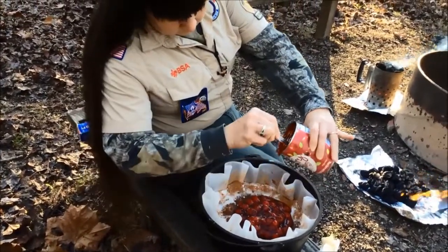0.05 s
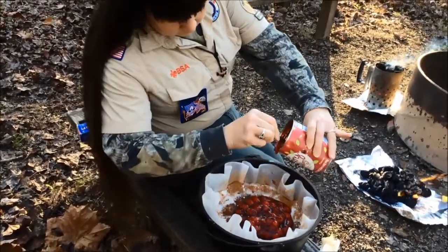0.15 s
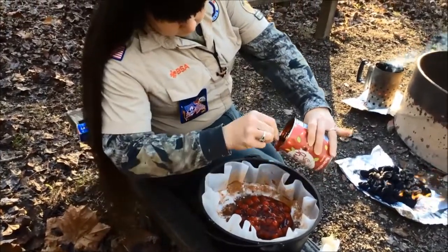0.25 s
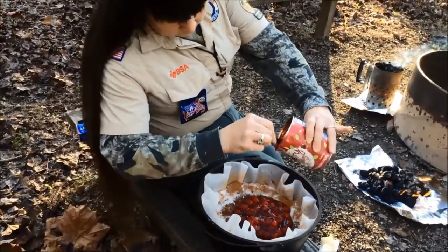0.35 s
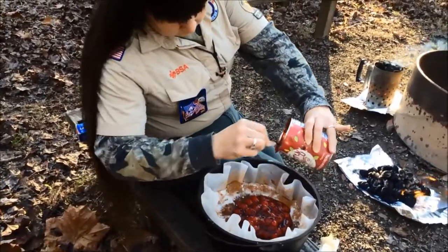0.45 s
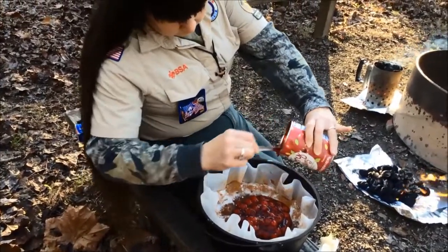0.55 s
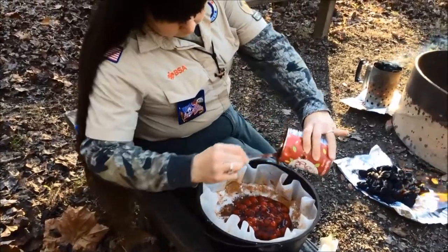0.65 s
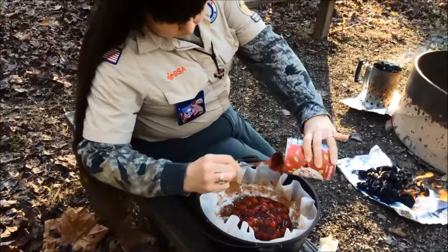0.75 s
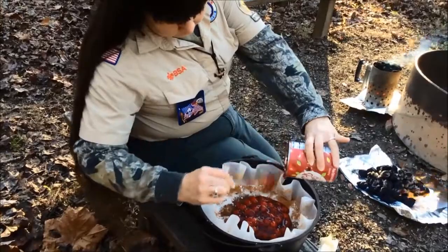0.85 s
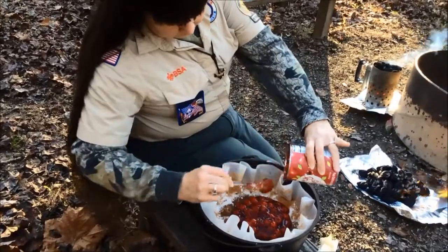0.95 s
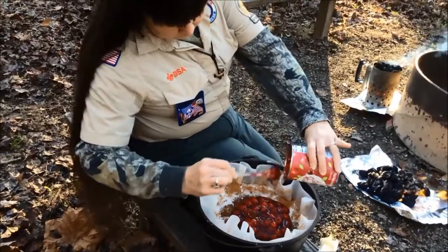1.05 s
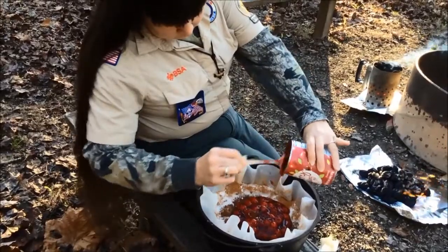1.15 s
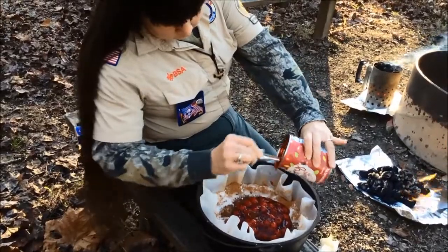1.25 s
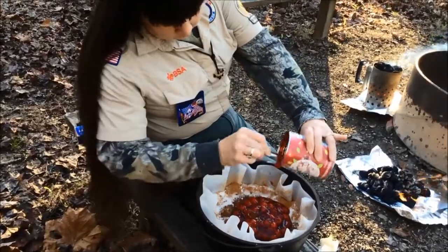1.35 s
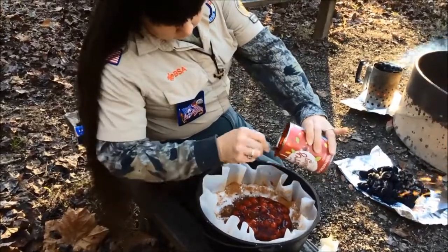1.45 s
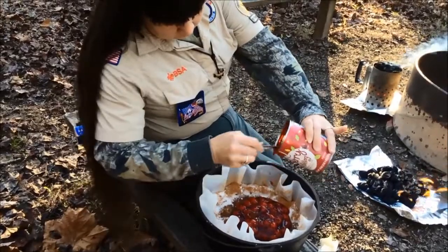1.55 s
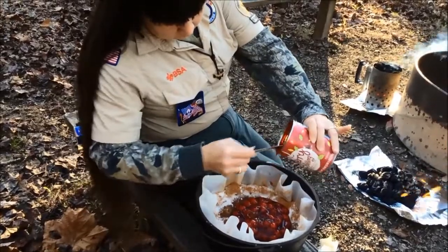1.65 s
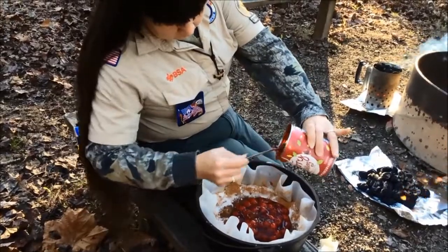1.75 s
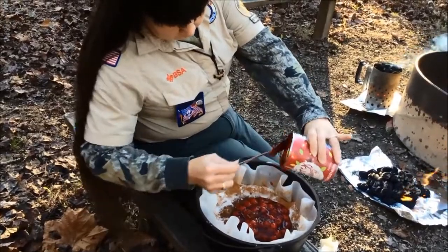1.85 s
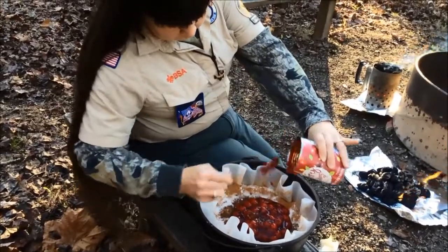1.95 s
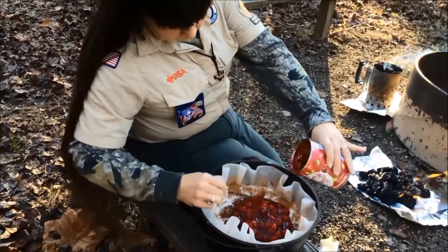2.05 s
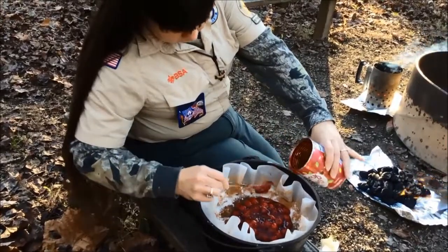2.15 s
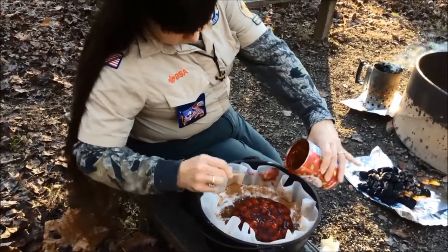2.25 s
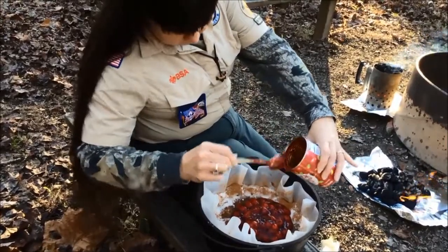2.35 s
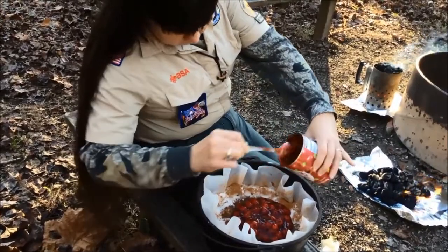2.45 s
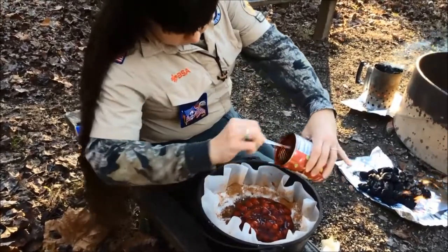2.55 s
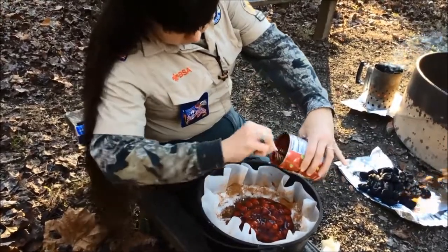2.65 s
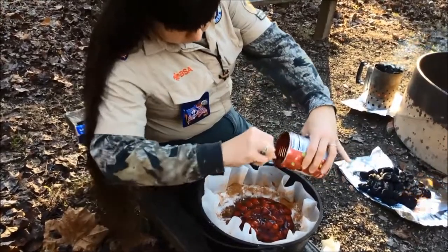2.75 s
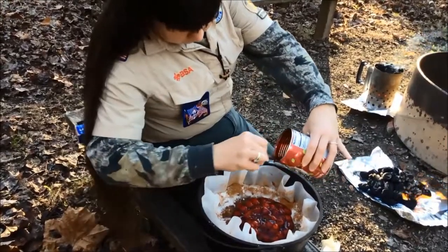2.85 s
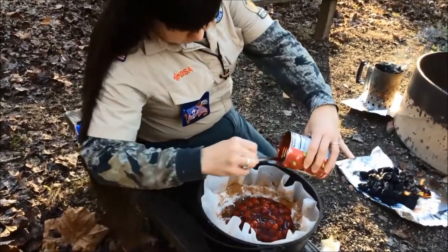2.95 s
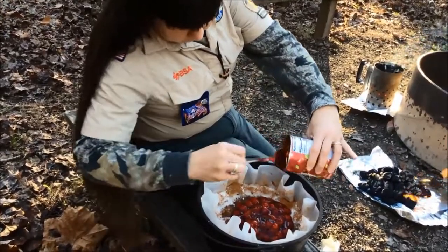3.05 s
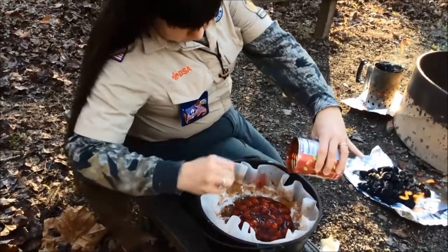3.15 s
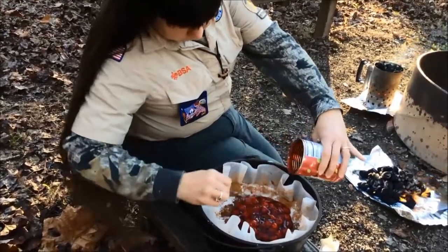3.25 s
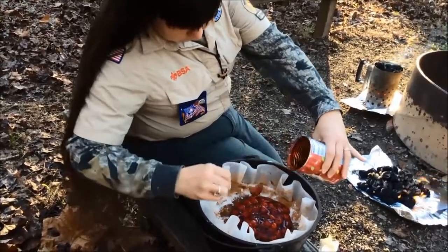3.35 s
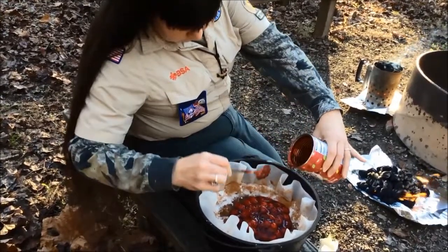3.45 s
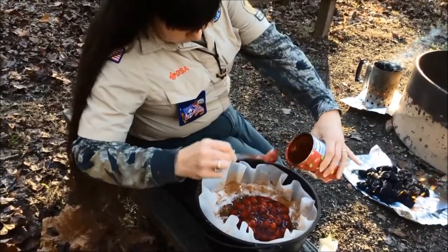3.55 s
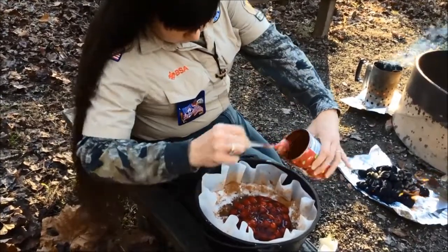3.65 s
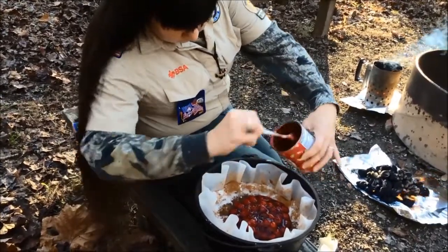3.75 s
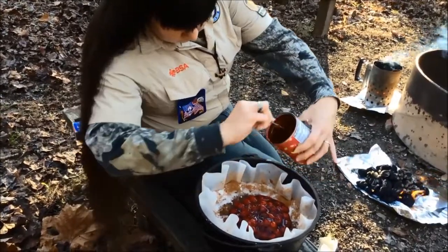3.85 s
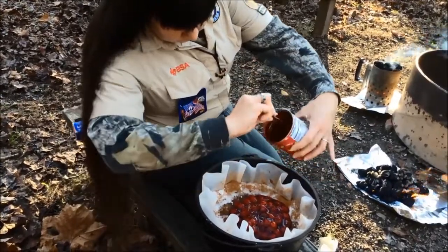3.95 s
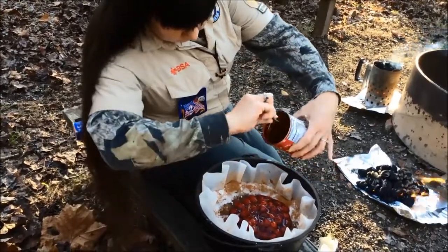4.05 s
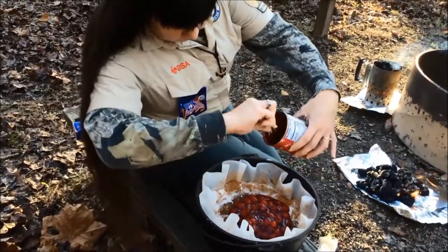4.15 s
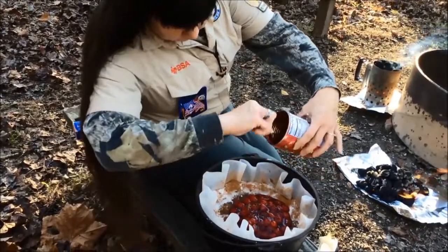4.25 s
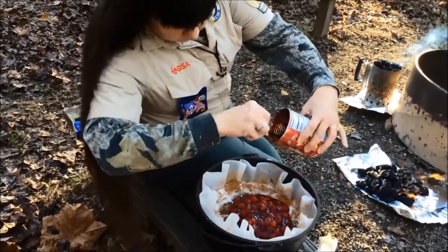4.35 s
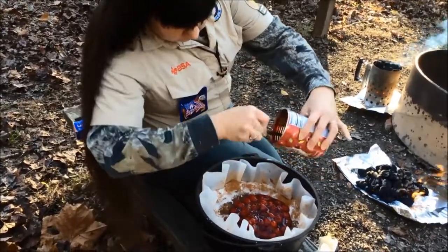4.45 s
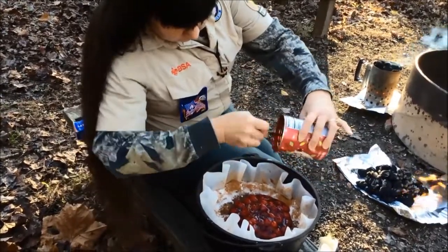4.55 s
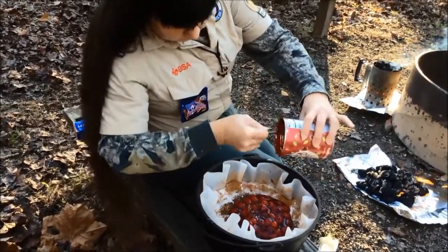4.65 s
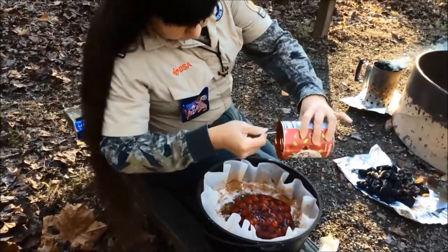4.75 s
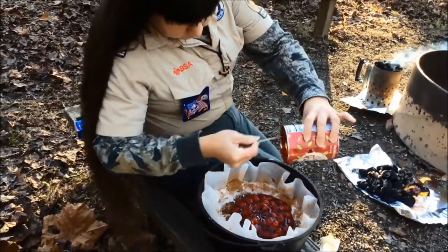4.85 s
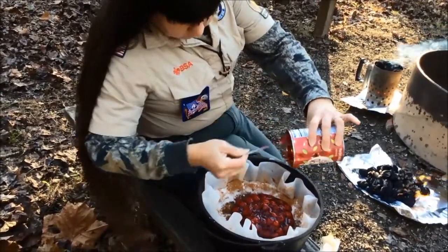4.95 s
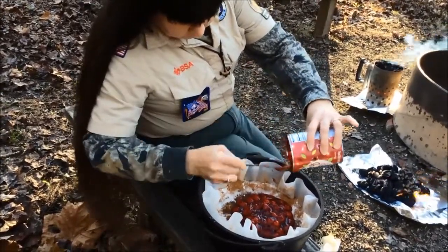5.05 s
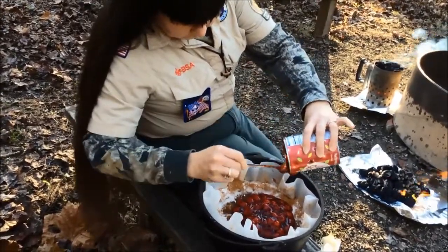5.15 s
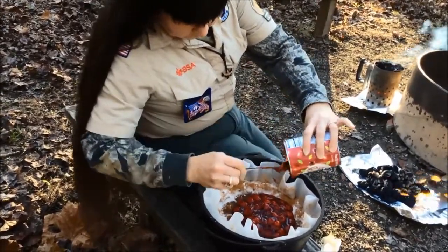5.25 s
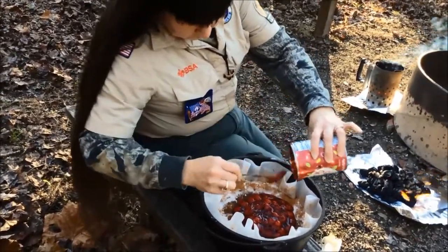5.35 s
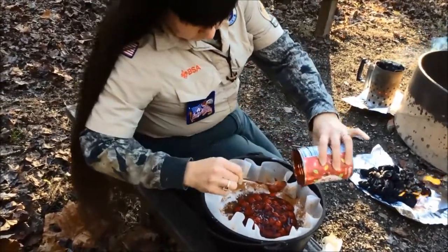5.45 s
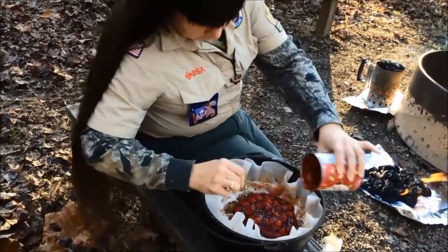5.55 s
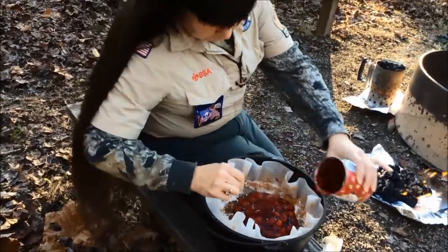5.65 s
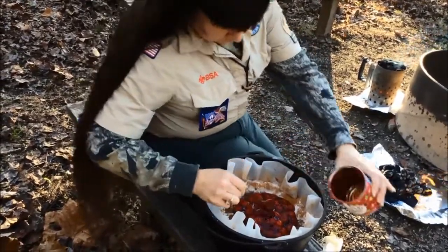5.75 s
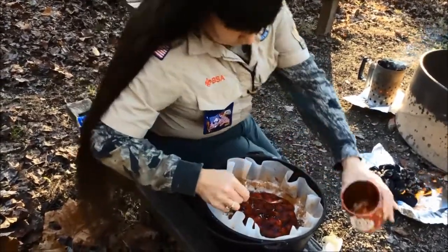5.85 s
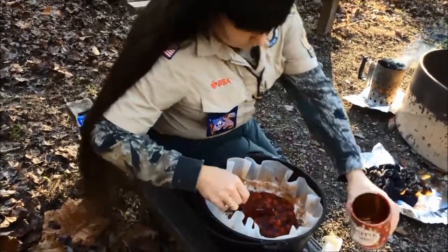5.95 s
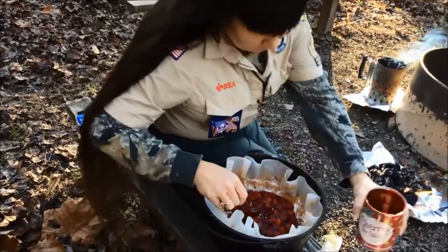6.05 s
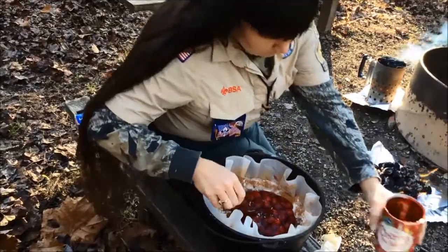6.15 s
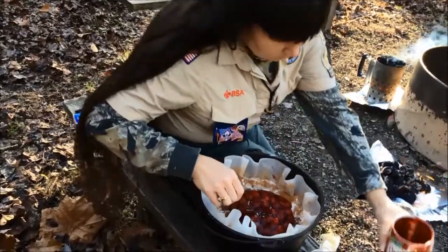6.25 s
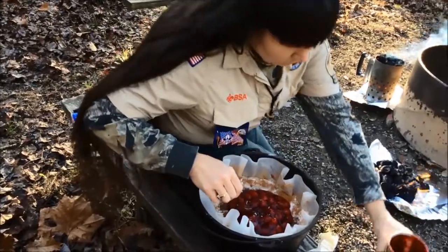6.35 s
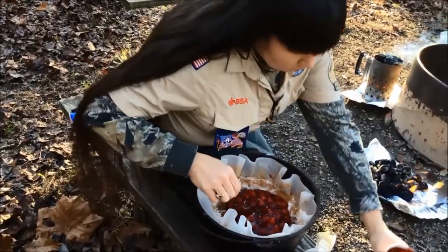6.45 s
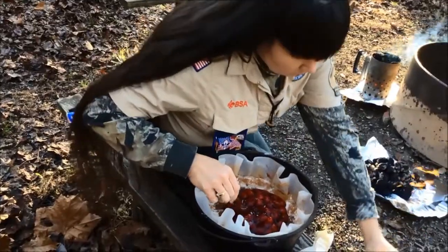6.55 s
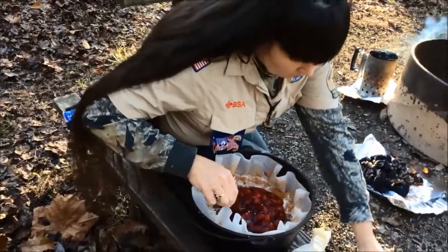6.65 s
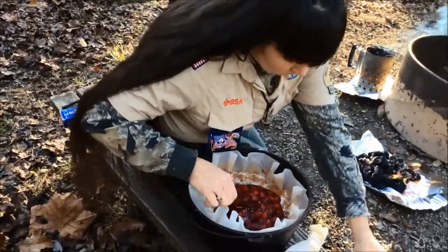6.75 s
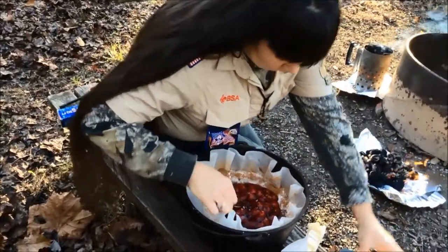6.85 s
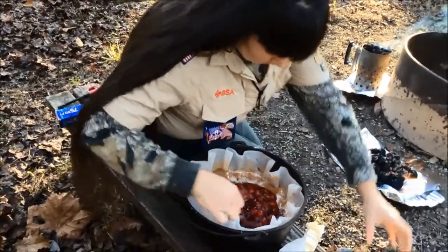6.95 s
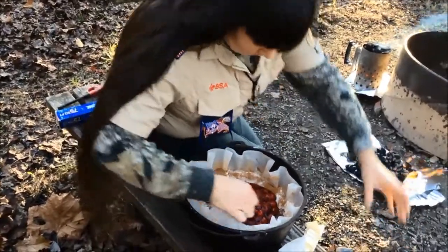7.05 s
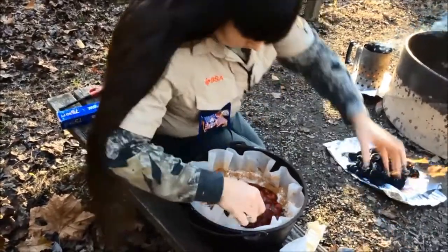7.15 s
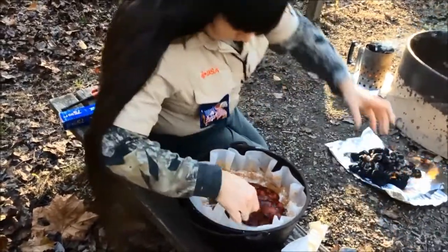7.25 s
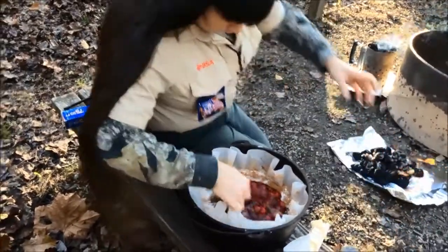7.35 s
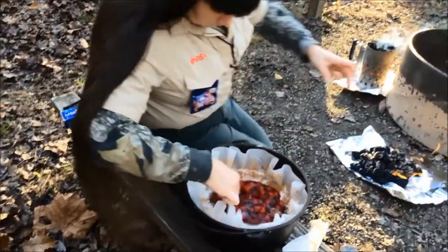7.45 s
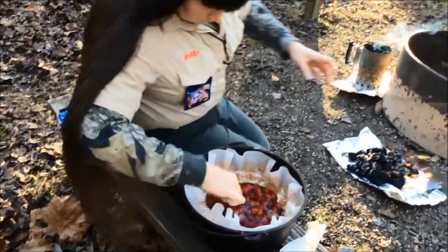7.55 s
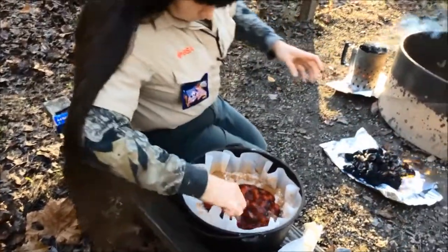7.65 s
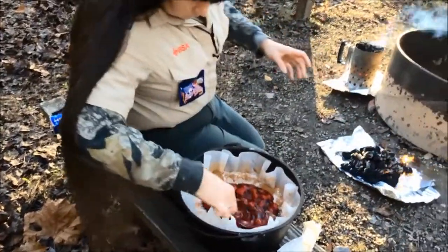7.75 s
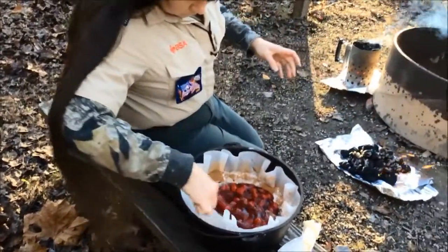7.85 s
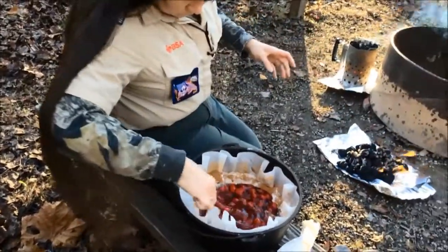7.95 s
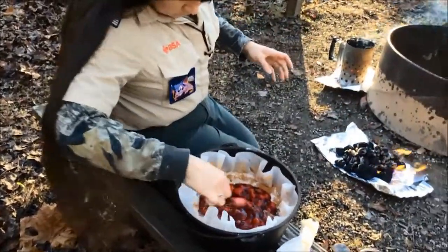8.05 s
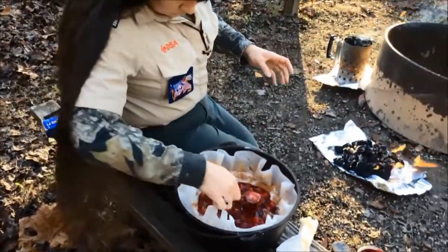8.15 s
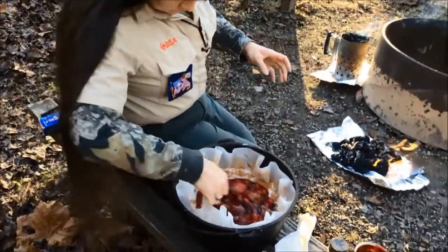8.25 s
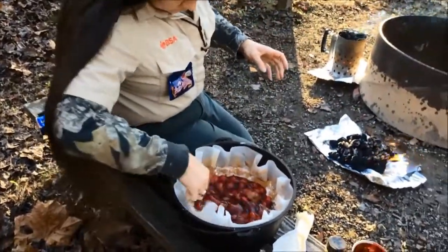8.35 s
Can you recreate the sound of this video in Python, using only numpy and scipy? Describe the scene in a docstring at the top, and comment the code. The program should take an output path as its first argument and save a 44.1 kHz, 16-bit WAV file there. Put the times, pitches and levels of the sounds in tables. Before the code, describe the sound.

A close, dry outdoor sound with faint low rumble, soft hiss and barely audible ticks throughout. From 0.1 to 0.9 seconds a metal spoon knocks lightly inside a hand-held tin can and scrapes, ending in a fast ribbed rattle. Around 1.4 to 2.0 come stronger, bright clinks, a run of clicks along the ribs and a short hard scrape. At 2.3 a tiny, high, dipping bird whistle sounds far off. A sharp clank at 2.8 leads to a softer scrape and another tap at 3.2; a crisp tick follows at 3.4. Lighter taps and scrapes continue from 3.9 to 5.5. At 5.8 there is a snap with a swish of cloth, then near quiet with small rustles. At 6.8 the empty can lands with a short, hollow, woody-tinny double thud. From 7.1 to 7.8 a paper liner rustles and snaps briskly, strongest at 7.6, with separate crackles at 8.0 and 8.4.

```python
"""Pie filling is spooned from a tin can into a paper-lined pot at a quiet campsite, over faint air and ticks.
At first the spoon knocks and scrapes on the can (decaying modes with noise cracks; grains through resonators)
and clicks along its ribs; early on a small bird calls far off (two gliding sines).
Then sleeves rustle (coloured grains), the emptied can is set down with a hollow thud (modes of can and board),
and the paper liner rustles and snaps as the filling is spread."""
import sys
import numpy as np
from scipy import signal
from scipy.fft import rfft, irfft, next_fast_len
from scipy.io import wavfile
from scipy.ndimage import uniform_filter1d

SR = 44100
rng = np.random.default_rng(int(sys.argv[2]) if len(sys.argv) > 2 else 0)


def to_wav(sig):
    """Store sig (one row per channel, or 1-D mono) as 16-bit WAV at the path in sys.argv[1].

    Samples outside -1..1 are clipped; the rate is SR.
    """
    pcm = np.clip(np.atleast_2d(sig), -1, 1) * 32767
    pcm = np.round(pcm).astype(np.int16)
    wavfile.write(sys.argv[1], SR, pcm.T)  # frames by channels


N = 371099
TIME = np.arange(N) / SR   # s
HIT = TIME[:SR // 3]   # time since a blow, s

# Modes of the can's rim. Each row: frequency in Hz, relative level in dB, t60 in seconds before scaling.
RIM_MODES = [(1420, -7.5, 0.12), (1605, 1.5, 0.067), (1900, 2.5, 0.022), (1810, -3, 0.011),
             (1900, 9.5, 0.018), (2090, -3.5, 0.15), (2464, 1.5, 0.041), (2120, 1, 0.039),
             (2540, -20.5, 0.17), (2780, -15, 0.028), (2860, 1, 0.11), (3084, 0, 0.053), (3224, 3, 0.084)]
# High modes of the thin sheet. Each row: frequency in Hz, relative level in dB.
SHEET_MODES = [(4170, 8), (4580, -12), (4927, -13.5), (5480, 12.5), (6080, -3.5), (6420, -29.5),
               (8100, -5.5), (9300, -15), (10300, 0), (11320, -26.5), (11950, 3.5), (12580, -11),
               (13200, -5), (13750, 9)]
# Colour of the crack of steel on tin. Each row: frequency in Hz, relative level in dB.
CRACK = [(300, -14), (1200, -6), (2500, -4), (3700, -11), (4200, -1), (5000, 1), (6200, -5), (7300, -7),
         (8500, -6), (10500, -1), (13300, 1.5), (15000, -3), (16500, -13.5)]
# The spoon is drawn along the wall. Each row: start in seconds, length in seconds, level, swell and
# mid-stroke sag in dB, rim and grit in dB re the wall, their dulling in dB, favoured Hz at start and at end.
STROKES = [(0.078, 0.047, -63, -2.5, -1.5, 5, 8, 6.5, 1060, 2300),
           (0.208, 0.091, -62, 18.5, -2, -9, -1, -2, 880, 1100),
           (0.578, 0.24, -46.5, -9, 8, -3, -6, 0, 930, 610),
           (0.808, 0.088, -53, 5.5, -2, 1, -1, 6, 900, 1000),
           (1.412, 0.038, -51.5, 2, 5.5, -2.5, 1, -8, 900, 900),
           (1.491, .034, -56.5, 7.5, 3, -6, 2.5, -3, 880, 1200),
           (1.65, 0.23, -57.5, 10, -3.5, 9.5, 1.5, 10, 1000, 610),
           (1.899, 0.11, -42.5, -1.5, -2, -14, -15.5, -7.5, 595, 770),
           (2.762, 0.089, -60, 28, -1, 4, 11.5, 25, 860, 1060),
           (2.972, 0.25, -54.5, 10.5, 0.5, 0, 4, 1.5, 950, 830),
           (3.962, 0.1, -56.5, 3, 6, 2, 9.5, 15, 675, 470),
           (4.187, 0.053, -58.5, 16, 1.5, 0.5, 12.5, 9, 1005, 1010),
           (4.398, .19, -66, 2, -2, -3, 0.5, 3, 1000, 1200),
           (4.643, 0.2, -64, 19, 1.5, -3, 2, 4.5, 980, 1400),
           (4.926, 0.16, -65, 10.5, -6, -1.5, 1.5, -4.5, 880, 640),
           (5.335, 0.066, -50, -4, -4, 2, 3.5, 0, 790, 940),
           (5.407, .062, -51.5, 0.5, 0.5, -9, -10, -18, 1000, 1040)]
# Treble colour of a snap of paper, foil or leaves. Each row: frequency in Hz, relative level in dB.
TICK_TOP = [(2500, -22), (4500, -7.5), (7000, 0), (10000, 0.5), (13000, 10.5), (16000, -9)]


def knocks():
    """Modal excitation: a blow rings base, wall and rim, and its contact point favours a few modes."""
    # Each row: start in seconds, level in dB, crack, base and rim in dB re that level before the offsets
    # below, favoured wall mode in Hz, its t60 in seconds, favoured rim mode in Hz.
    knock_rows = [(0.24, -37, 12.4, -12, -8.5, 972, 0.053, 1940), (0.2648, -56, 25, 4, -2, 950, .1, 2050),
                  (0.3887, -47, 23.5, 0.5, 0.5, 785, 0.24, 2060),
                  (0.5689, -49.5, 19, 3, -5, 961, 0.084, 2200),
                  (1.4175, -52.5, 25.7, -12, 0, 592, 0.12, 1960),
                  (1.4538, -24, 7.2, -8, -7, 1080, 0.096, 1620),
                  (1.5309, -28, 8, -12, -6, 1000, 0.084, 2300),
                  (1.5524, -34, 11.7, -13, 0, 944, 0.15, 1770),
                  (2.7571, -54, 33.3, 0, -13, 641, 0.066, 1890),
                  (2.802, -23.5, 15, -7, -5, 1080, 0.071, 2330),
                  (2.8429, -37, 26.2, 0, -1.5, 805, 0.25, 2295),
                  (2.964, -43, 11.4, -10, 1.5, 970, .08, 2040),
                  (3.2362, -30.5, 19, -22, 2, 986, 0.16, 2600),
                  (3.9438, -46, 24.7, -1, -3, 547, 0.047, 2006),
                  (4.0623, -33, 17.8, 5, -4.5, 948, 0.13, 2090),
                  (4.216, -40.5, 10, -4, 1, 1060, 0.081, 2100),
                  (4.2494, -36, 15, -4.5, 1.5, 999, .12, 2255),
                  (4.7561, -38.5, 7, -13, -6, 874, 0.16, 2160),
                  (4.7678, -38.5, 12.5, -7.5, -6, 1120, 0.12, 1400),
                  (4.819, -36.5, 13, -20, -9, 868, .1, 2060), (5.22, -40.5, 14.3, -25, -2, 635, .1, 2580),
                  (5.308, -36.5, 14.7, -28, 0, 799, 0.13, 1700),
                  (5.4706, -41, 20.3, -10, 4, 1030, 0.13, 2560)]
    # Bottom of the can. Each row: frequency in Hz, relative level in dB, t60 in seconds.
    base_modes = [(360, -10, 0.15), (447, 9, 0.013), (484, 9, 0.077), (502, -22, 0.1)]
    # Wall of the can held in a hand. Each row: frequency in Hz, relative level in dB, t60 in seconds.
    wall_modes = [(602, -13.5, 0.19), (610, 13, 0.057), (790, -5.5, 0.081), (900, 9, 0.064),
                  (996, -5, 0.12), (1080, 14.5, 0.068), (1210, -5, 0.1)]
    # The one mode that the hand hardly damps: frequency in Hz, relative level in dB, t60 in seconds.
    singing_mode = (790, 0, 0.3)
    singing_db = -18   # re the level of the knock
    chatter_s, chatter_db = 0.0065, -19.5   # typical delay of a second touch; dB re the knock's crack level, so about 9.5 dB below the first noise burst
    sheet_modes = [(hz, db, .045) for hz, db in SHEET_MODES]
    out = np.zeros(N)
    for s, db, crack_db, base_db, rim_db, wall_hz, wall_t60, rim_hz in knock_rows:
        base = onset_one(ring(base_modes, scatter_db=-3, detune=0.015))
        wall = onset_one(ring([(wall_hz, 0, wall_t60)], 0))
        wall += from_db(-5) * onset_one(ring(wall_modes, scatter_db=14, detune=0.015))
        rim = onset_one(ring([(rim_hz, 0, .1)], 0))
        rim += from_db(3.2) * onset_one(ring(RIM_MODES, scatter_db=2, length=0.98, detune=0.0055))
        singing = from_db(singing_db) * ring([singing_mode], 0)
        body = from_db(base_db - 8.0) * base
        body += from_db(-3.5) * onset_one(wall)
        body += from_db(rim_db - 4.0) * onset_one(rim)
        crack = from_db(-10.0) * burst(CRACK, t60=0.019, tail_db=-9, tail_t60=0.04)
        shimmer = from_db(-24.5) * onset_one(ring(sheet_modes, scatter_db=15.0, detune=0.012))
        add(out, s, from_db(db) * (body + singing + from_db(crack_db) * (crack + shimmer)))
        again = burst(CRACK, t60=0.022, tail_db=-16.5, tail_t60=.05)
        add(out, s + chatter_s * rng.uniform(0.46, 1.7), from_db(db + crack_db + chatter_db) * again)
    return edge(out, 190, "high")


def scraping():
    """Stick-slip friction: fine slips and coarser jerks drive resonances of wall, rim and sheet."""
    # Colour of the gritty friction. Each row: frequency in Hz, relative level in dB.
    grit_colour = [(1760, -34.5), (3000, -14), (3220, -15.5), (3430, 0), (3780, -1), (4800, 3), (5920, -8),
                   (6620, -10), (7100, -11), (7620, -5.5), (13400, -0.5), (14700, 0.5), (16000, -20.5)]
    # Wall while the spoon presses on it. Each row: frequency in Hz, bandwidth in Hz, relative level in dB.
    pressed_wall = [(400, 140, -5), (595.3, 28.5, 10.5), (618, 94, 1), (757, 100, -3), (880, 94, -5.5),
                    (979, 7.8, 11), (1014, 56, -2.5)]
    # Rim while the spoon presses on the can. Each row: frequency in Hz, bandwidth in Hz, relative level in dB.
    pressed_rim = [(1472, 130, -15), (1700, 62, 10.5), (1960, 740, 6), (2160, 250, 7), (2330, 120, -9),
                   (2580, 119, 2.5), (2990, 760, -7.5), (3100, 94, -20)]
    wall_gain, rim_gain, grit_gain = stroke_gains()
    points = []
    for s, length, *_, from_hz, to_hz in STROKES:
        points += [(s, from_hz), (s + length, to_hz)]
    point_s, point_hz = np.transpose(points)
    favoured_hz = np.interp(TIME, point_s, point_hz)

    slips = grains(per_s=5000, spread_db=2.0) * from_db(2.85 * drift(130))
    slips += from_db(-13.5) * grains(per_s=150, spread_db=2.0)
    wall = resonate(edge(slips, 300, "high"), pressed_wall, wander_db=3.0,
                    favoured_hz=favoured_hz, db_per_octave=10.5)
    rim = resonate(slips, pressed_rim, wander_db=5.0)
    sheet = resonate(slips, [(hz, 110, db) for hz, db in SHEET_MODES], wander_db=5)
    friction = patchy(coloured(slips, grit_colour), depth_db=6.5, per_s=22)
    grit = steadied(friction + from_db(-9.5) * sheet)
    return (from_db(-0.47) * wall_gain * wall + from_db(0.25) * rim_gain * rim
            + from_db(0.24) * grit_gain * grit)


def stroke_gains():
    """Contact pressure sets friction strength: it builds, eases or peaks half-way, then decays on release."""
    attack_s = 0.0091
    wall_release_t60, rim_release_t60, grit_release_t60 = 0.097, 0.073, 0.027   # s
    wall, rim, grit = np.zeros((3, N))
    t = TIME[:SR]
    for s, length, db, swell_db, sag_db, rim_db, grit_db, dulling_db, _, _ in STROKES:
        along, after = np.minimum(t / length, 1), np.maximum(t - length, 0)
        level_db = db + swell_db * along - sag_db * np.sin(np.pi * along) ** 2
        pressure = np.minimum(t / attack_s, 1) * from_db(level_db)
        release = -np.log(1000) * after   # ln(1000) is 60 dB
        add(wall, s, pressure * np.exp(release / wall_release_t60))
        add(rim, s, pressure * from_db(rim_db - dulling_db * along) * np.exp(release / rim_release_t60))
        add(grit, s, pressure * from_db(grit_db - dulling_db * along) * np.exp(release / grit_release_t60))
    return wall, rim, grit


def ribs():
    """Serial impacts: the spoon's edge drops off one rib after another, cracking and briefly ringing the rim."""
    # Each row: first drop in seconds, first gap in seconds, ratio of each gap to the one before,
    # number of ribs, mean crack peak in dB, rim in dB re that peak before the offset below.
    rib_runs = [(0.586, .0147, .88, 3, -38, -8), (0.6815, .0175, 1.05, 5, -50, -8),
                (1.5952, .052, 1, 2, -51, 3), (1.692, .0205, 1.06, 5, -43, 1),
                (1.7975, .018, 1.103, 8, -39.5, -1)]
    out = np.zeros(N)
    for s, gap, slowing, number, peak_db, rim_db in rib_runs:
        for k in range(int(round(number))):
            answer = onset_one(ring(RIM_MODES, scatter_db=2.0, length=0.35, detune=0.0033))
            crack = burst(CRACK, t60=0.01, tail_db=-15, tail_t60=0.11)
            gain = from_db(peak_db + 1.3 * rng.standard_normal())
            add(out, s, gain * (from_db(rim_db - 16.5) * answer + crack))
            s = s + gap * slowing ** k
    return out


def set_down():
    """Coupled modes: the can's base brushes the board, lands and rocks once; can and board boom together."""
    # Touches of the can on the board. Each row: time in seconds, level in dB.
    touches = [(6.784, -55), (6.795, -41.5), (6.7995, -40), (6.8032, -18.5), (6.8135, -27)]
    # Modes of can and board. Each row: frequency in Hz, relative level in dB, t60 in seconds.
    thud_modes = [(205, -17, .035), (270, -17, 0.045), (350, -9, 0.03), (410, -5.5, 0.025), (466, -3, 0.05),
                  (651, 1, 0.085), (736, -23, 0.025), (785, -11.5, 0.2), (840, 1, 0.032),
                  (930, -15.5, 0.046), (1000, -4.5, 0.028), (1014, -5, 0.032), (1218, -26, .06),
                  (1400, -14.5, .16), (1426, -14, 0.088), (1480, -21.5, 0.17), (1980, -21.5, 0.039),
                  (2594, -24.5, 0.14), (2820, -24.5, 0.054)]
    # Colour of the dull contact with the board. Each row: frequency in Hz, relative level in dB.
    board_contact = [(100, -9), (300, -0.5), (900, -8.5), (1300, -15.5), (2800, -35.5), (4800, -25.5),
                     (7000, -47.5), (15000, -25)]
    out = np.zeros(N)
    for s, db in touches:
        boom = onset_one(ring(thud_modes, scatter_db=.5))
        contact = burst(board_contact, t60=0.031, tail_db=-16, tail_t60=0.14)
        add(out, s, from_db(db) * onset_one(boom + from_db(-5.5) * contact))
    return edge(out, 190, "high")


def rustling():
    """Granular friction: rubbing cloth and paper hiss in fine grains of shifting colour; creases snap on top."""
    # Colour of cloth and paper. Each row: frequency in Hz, relative level in dB.
    rustle_colour = [(240, -24.5), (400, -17.5), (616, -9.5), (730, -15), (1070, -8.5), (1630, -15),
                     (2020, -11.5), (2800, -15), (4650, -6), (8900, -4), (12900, 0.5), (14100, 1.5),
                     (16000, -16)]
    # Clearest snaps of paper, foil and leaves. Each row: time in seconds, treble peak in dB and
    # body in dB, both before the offsets below.
    snaps = [(2.119, -44, -59), (2.139, -45, -59), (2.186, -52, -42), (2.2235, -58, -46.5),
             (2.5586, -45, -64), (3.4218, -28, -45.5), (3.537, -39.5, -55.5), (3.5861, -40.5, -61),
             (5.7868, -25.5, -63.5), (6.0174, -49, -59), (6.3948, -39, -47), (6.429, -42.5, -66),
             (6.9093, -39.5, -54), (7.091, -41, -47), (7.1576, -34, -36), (7.1936, -24.5, -29.5),
             (7.2671, -23, -34), (7.324, -39, -31), (7.4747, -31, -34), (7.535, -23, -41),
             (7.6107, -16.5, -31.5), (7.7502, -24, -52), (8.069, -21, -35), (8.3681, -24, -41),
             (8.3803, -25, -51)]
    # Colour of a snap's body. Each row: frequency in Hz, relative level in dB.
    snap_body_colour = [(300, -31), (700, -3), (1400, -1), (2600, -0.5), (4000, 2.5), (7000, -1.5)]
    creases_per_s, crease_db = 35, -12   # small creases that give way as cloth and paper move
    hiss_gain, body_gain = rustle_gains()
    crinkle = coloured(grains(per_s=6500, spread_db=1.5) * from_db(2.8 * drift(170)), rustle_colour)
    hiss = steadied(patchy(edge(crinkle, 2610, "high"), depth_db=1.5, per_s=19))
    rub = steadied(edge(crinkle, 2690, "low")) * from_db(3.2 * drift(60))
    crease = burst(rustle_colour, t60=0.0074, tail_db=-27.5, tail_t60=0.02)
    creases = rms_one(signal.fftconvolve(grains(creases_per_s, spread_db=-2.5), crease)[:N])
    out = hiss_gain * (from_db(-3.0) * hiss + from_db(crease_db) * creases)
    out += from_db(-2.5) * body_gain * rub
    for s, peak_db, body_db in snaps:
        top = burst(TICK_TOP, t60=0.0076, tail_db=-27, tail_t60=0.035)
        body = onset_one(burst(snap_body_colour, t60=0.029, tail_db=-14.0, tail_t60=0.083))
        add(out, s, from_db(peak_db - 7.0) * top + from_db(body_db - 9.5) * body)
    return out


def rustle_gains():
    """Amplitude envelopes of hiss and body: one long spreading, and swishes with a Gaussian swell."""
    # Rustle while the filling is spread. Each row: time in seconds, level in dB before the hiss and body offsets.
    spreading_levels = [(7.1, -50), (7.188, -41), (7.39, -44.5), (7.472, -37.5), (7.59, -40.5),
                        (7.612, -35.5), (7.622, -36.5), (7.758, -40.5), (7.97, -54.5)]
    # Sleeve or liner swishes. Each row: middle in seconds, half length in seconds,
    # hiss and body in dB before the mixing gains.
    swishes = [(5.792, 0.1, -46, -56.5), (6.264, 0.019, -67, -58), (6.413, 0.0054, -70, -49),
               (6.655, 0.24, -64, -71.5), (7.019, 0.036, -49, -55), (8.009, 0.015, -36.5, -50.5),
               (8.083, 0.1, -55, -64.5), (8.406, 0.037, -42, -57)]
    hiss_db, body_db, fade_s = 2, -11.5, 0.021
    s, db = np.transpose(spreading_levels)
    gate = np.interp(TIME, [s[0] - fade_s, s[0], s[-1], s[-1] + fade_s], [0, 1, 1, 0])
    spreading = gate * from_db(np.interp(TIME, s, db))
    hiss, body = from_db(hiss_db) * spreading, from_db(body_db) * spreading
    for middle, half_length, swish_hiss_db, swish_body_db in swishes:
        swell = np.exp(-np.minimum(((TIME - middle) / half_length) ** 2, 20))
        hiss += from_db(swish_hiss_db) * swell
        body += from_db(swish_body_db) * swell
    return hiss, body


def bird():
    """Frequency modulation: a thin dipping whistle in two parallel voices, blurred by the trees."""
    # Points of the call. Each row: time in seconds, pitch of the first voice in Hz, its level in dB.
    call_points = [(2.279, 8100, -77), (2.305, 7700, -70), (2.336, 7340, -67), (2.375, 7900, -68),
                   (2.395, 8800, -64)]
    second_voice = .91   # pitch re the first
    s, hz, db = np.transpose(call_points)
    pitch = np.interp(TIME, s, hz) * (1 + 0.0079 * drift(830))
    phase = 2 * np.pi * np.cumsum(pitch) / SR
    envelope = np.interp(TIME, s, from_db(db), left=0, right=0)
    call = envelope * (np.sin(phase) + 0.56 * np.sin(second_voice * phase))
    return call + surroundings(call, wet_db=-3, t60=0.42)


def stray_ticks():
    """A random impulse process: embers and dry leaves tick faintly now and then."""
    ticks_per_s, level_db = 7, -76.5   # mean rate; rms
    tick = burst(TICK_TOP, t60=0.0061, tail_db=-30, tail_t60=.03)
    return from_db(level_db) * rms_one(signal.fftconvolve(grains(ticks_per_s, spread_db=6), tick)[:N])


def air():
    """Filtered noise: distant rumble and a faint, almost even hiss."""
    # Colour of the outdoor background. Each row: frequency in Hz, relative level in dB.
    air_colour = [(15, -69), (25, -53), (48, -10.5), (170, -8.5), (249, -13.5), (293, -14.5), (416, -25),
                  (463, -24.5), (887, -29), (2220, -37.5), (3340, -35.5), (3620, -34), (6740, -40),
                  (14800, -34.5), (16000, -48.5)]
    level_db = -61   # rms before the slight wavering
    noise = rms_one(coloured(rng.standard_normal(N), air_colour))
    return from_db(level_db) * noise * from_db(.5 * drift(5.5))


def surroundings(x, wet_db, t60):
    """Diffuse scattering: ground and trees send back a short diffuse tail that keeps its treble, as convolution
    with decaying noise."""
    noise = rng.standard_normal(len(HIT)) * fading(t60) * (HIT > .006)   # starts after 6 ms
    tail = coloured(noise, [(200, -8), (1000, -2.0), (4000, -8), (15000, -3.0)])   # (Hz, dB)
    return from_db(wet_db) * signal.fftconvolve(x, tail / np.sqrt(np.sum(tail ** 2)))[:N]


def ring(modes, scatter_db, length=1, detune=0):
    """Modal superposition: decaying partials, each blow giving every mode its own strength, sign and detuning."""
    hz, db, t60 = np.transpose(modes)[:, :, None]
    strength, shift, sign = rng.standard_normal((3, len(modes), 1))
    decay = np.exp(-np.log(1000) * HIT / (t60 * length))
    waves = np.cos(2 * np.pi * hz * (1 + detune * shift) * HIT) * decay
    swell = 1 - np.exp(-2 * HIT * hz)   # a mode takes about half a cycle to get going
    return np.sum(np.sign(sign) * from_db(db + scatter_db * strength) * swell * waves, axis=0)


def burst(spectrum, t60, tail_db, tail_t60):
    """Two-stage decay of coloured noise: a sharp crack with a weak longer tail; peak 2 ms rms is 1."""
    envelope = fading(t60) + from_db(tail_db) * fading(tail_t60)
    x = coloured(rng.standard_normal(len(HIT)) * envelope, spectrum)
    return x / np.sqrt(uniform_filter1d(x ** 2, size=SR // 500, mode="constant").max())


def resonate(x, peaks, wander_db, favoured_hz=1000, db_per_octave=0):
    """Parallel two-pole resonances (Hz, width, dB) come and go as the contact point moves; steady rms 1."""
    out = np.zeros(N)
    for k, (hz, width, db) in enumerate(peaks):
        r = np.exp(-np.pi * width / SR)   # pole radius
        poles = [1, -2 * r * np.cos(2 * np.pi * hz / SR), r * r]
        tone = signal.lfilter([1 - r * r, 0, r * r - 1], poles, x)
        octaves_off = np.abs(np.log2(hz / favoured_hz))
        gain = from_db(db + wander_db * drift(14) - db_per_octave * octaves_off)
        out += (-1) ** k * gain * tone
    return steadied(out)


def grains(per_s, spread_db):
    """A random impulse process: clicks of uneven size and sign; rms 1."""
    sizes = from_db(spread_db * np.minimum(rng.exponential(1, N), 4)) * rng.choice([-1, 1], N)
    return rms_one(sizes * (rng.random(N) < per_s / SR))


def drift(per_s):
    """Linear interpolation of random knots of unit spread, per_s of them a second."""
    knots = rng.standard_normal(8192)
    return np.interp(TIME * per_s, np.arange(len(knots)), knots)


def patchy(x, depth_db, per_s):
    """Independent band modulation: each narrow band swells and sinks on its own; rms 1."""
    size = next_fast_len(N)
    edges = np.geomspace(900, 16000, num=20)   # Hz
    band = np.searchsorted(edges, np.fft.rfftfreq(size, 1 / SR))
    spectrum = rfft(x, size)
    out = np.zeros(N)
    for k in range(len(edges) + 1):
        out += irfft(spectrum * (band == k), size)[:N] * from_db(depth_db * drift(per_s))
    return rms_one(out)


def steadied(x):
    """Friction under even pressure keeps its strength from moment to moment; rms 1 over 40 ms."""
    return x / np.sqrt(np.maximum(uniform_filter1d(x ** 2, size=SR // 25), 1e-12))


def coloured(x, spectrum):
    """Causal minimum-phase filter with the given (Hz, dB) shape, by folding the cepstrum."""
    size = 4096
    hz, db = np.transpose(spectrum)
    grid = np.maximum(np.arange(size // 2 + 1) * SR / size, 1)
    cepstrum = irfft(np.log(from_db(np.interp(np.log(grid), np.log(hz), db))))
    cepstrum[1:size // 2] *= 2
    cepstrum[size // 2 + 1:] = 0
    return signal.fftconvolve(x, irfft(np.exp(rfft(cepstrum))))[:len(x)]


def edge(x, hz, kind):
    """Steep fourth-order high- or low-pass."""
    return signal.sosfilt(signal.butter(4, hz, kind, fs=SR, output="sos"), x)


def fading(t60):
    """Exponential decay: falls 60 dB in t60 seconds."""
    return np.exp(-np.log(1000) * HIT / max(t60, 1e-4))


def from_db(db):
    """Decibels to amplitude gain."""
    return 10 ** (np.asarray(db) / 20)


def rms_one(x):
    """Scale to unit rms."""
    return x / np.sqrt(np.mean(x ** 2) + 1e-20)


def onset_one(x):
    """Scale a blow to unit rms over its first 20 ms."""
    return x / np.sqrt(np.mean(x[:SR // 50] ** 2) + 1e-20)


def add(out, s, sound):
    """Superpose a sound at time s."""
    at = int(round(s * SR))
    out[at:at + len(sound)] += sound[:N - at]


def scene():
    """Superposition of all the handling, close by, in the open air."""
    near = knocks() + scraping() + ribs() + set_down() + rustling()
    scattered = surroundings(near, wet_db=-15.5, t60=0.16)
    return (near + scattered + bird() + stray_ticks() + air())[None]


def record(dry):
    """Band limiting: an elliptic low-pass cuts steeply above 16 kHz."""
    return signal.sosfilt(signal.ellip(10, .2, 80, 16000, fs=SR, output="sos"), dry)


dry = scene()
out = record(dry)
to_wav(out)
```